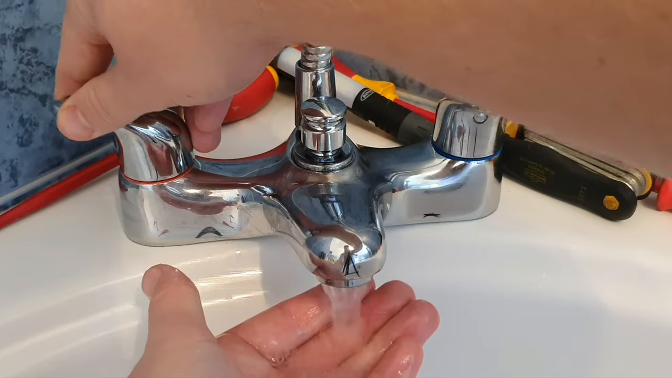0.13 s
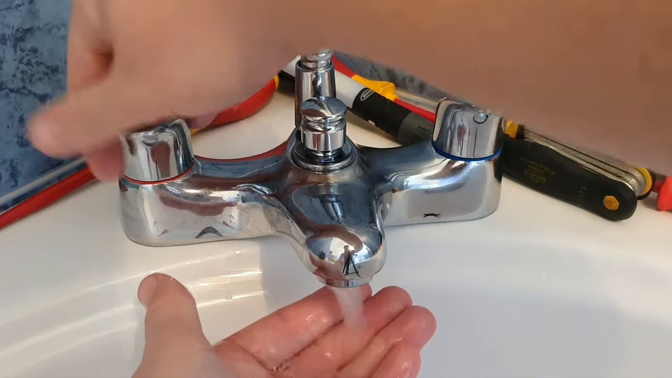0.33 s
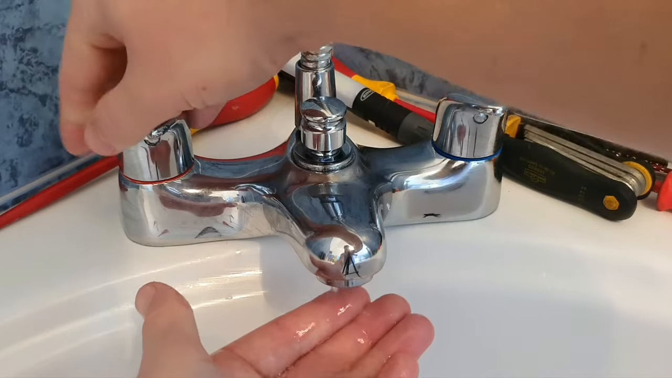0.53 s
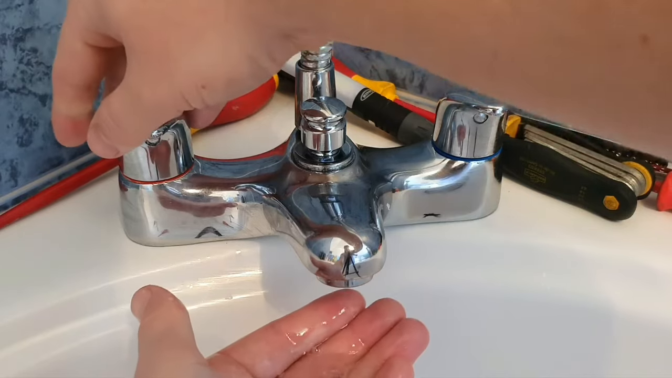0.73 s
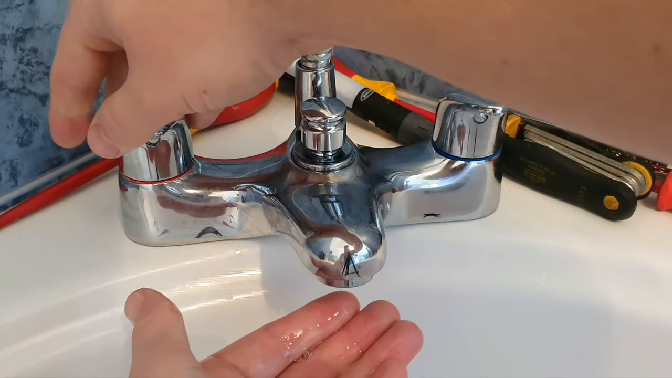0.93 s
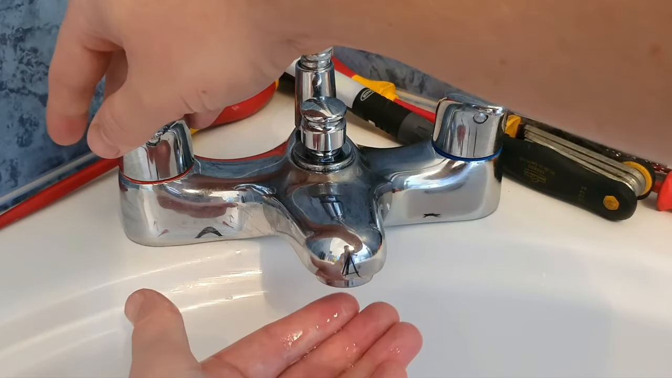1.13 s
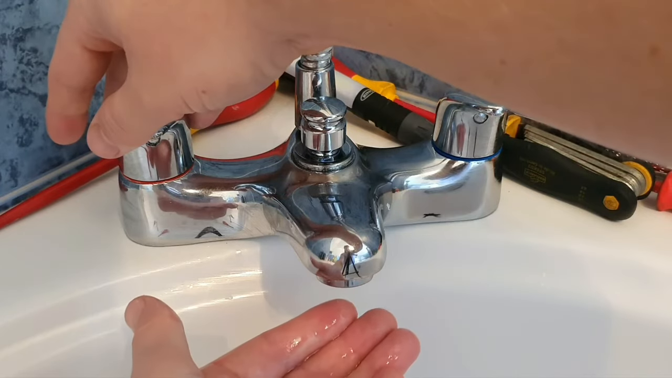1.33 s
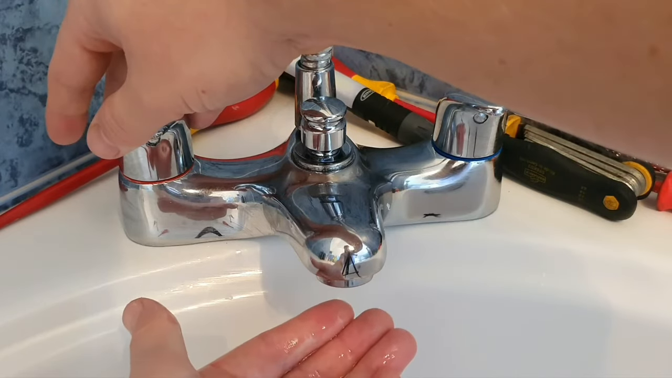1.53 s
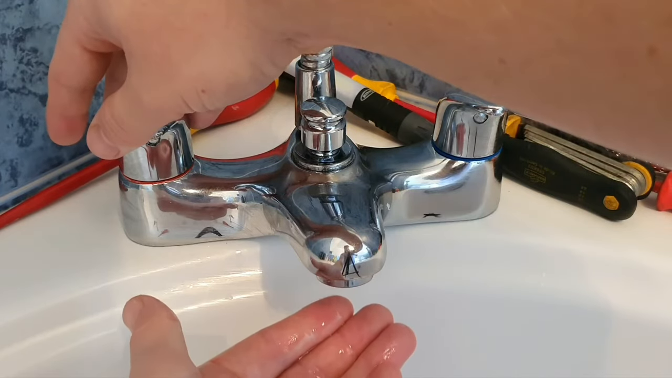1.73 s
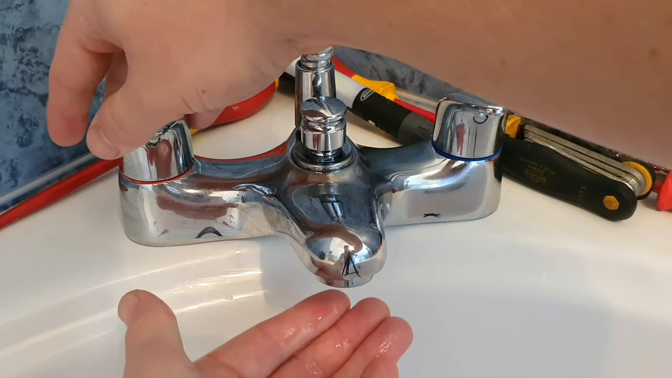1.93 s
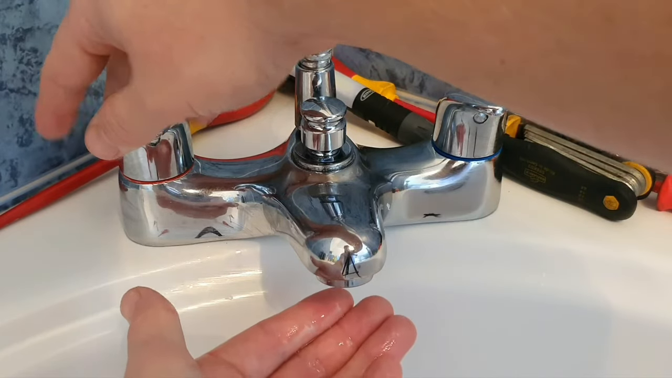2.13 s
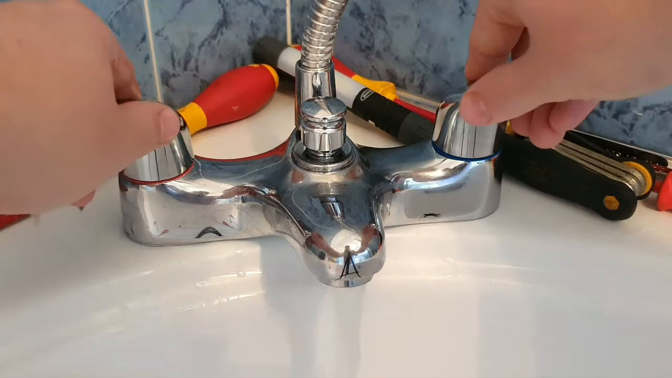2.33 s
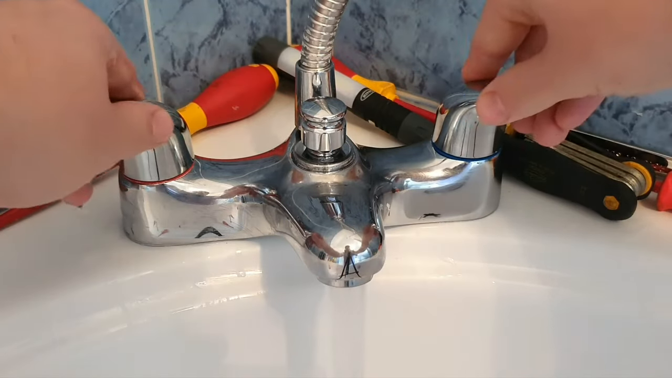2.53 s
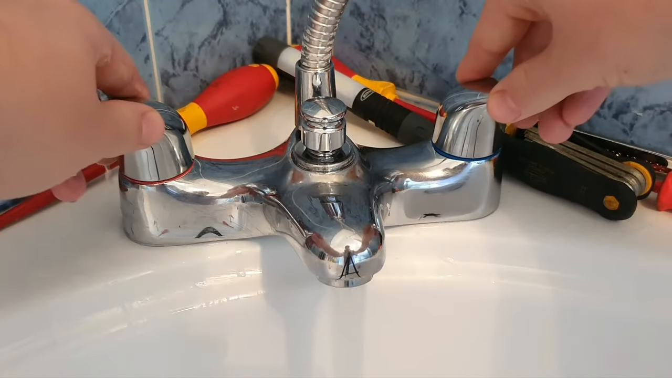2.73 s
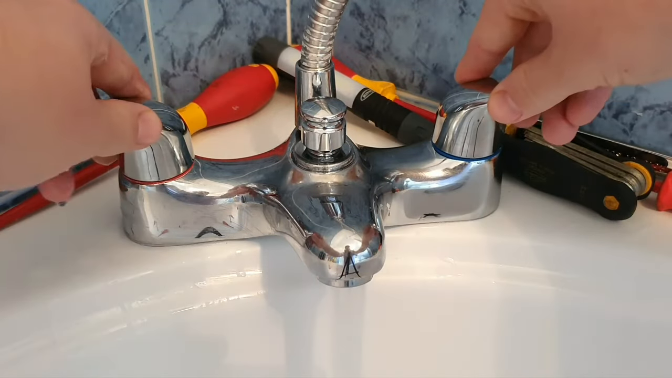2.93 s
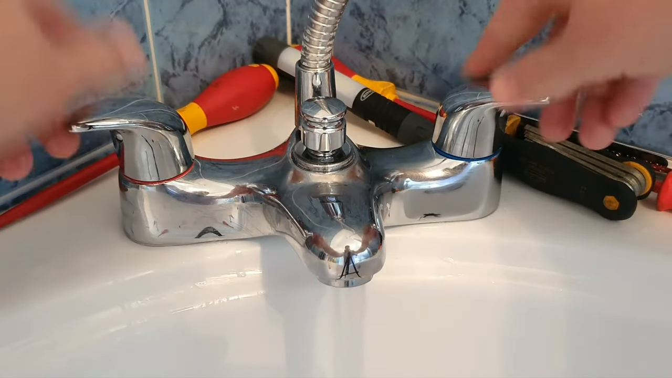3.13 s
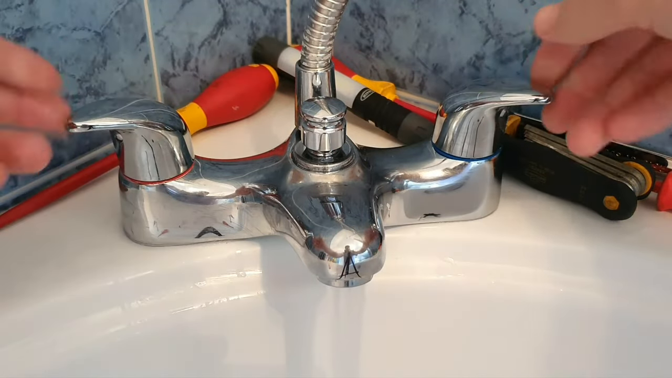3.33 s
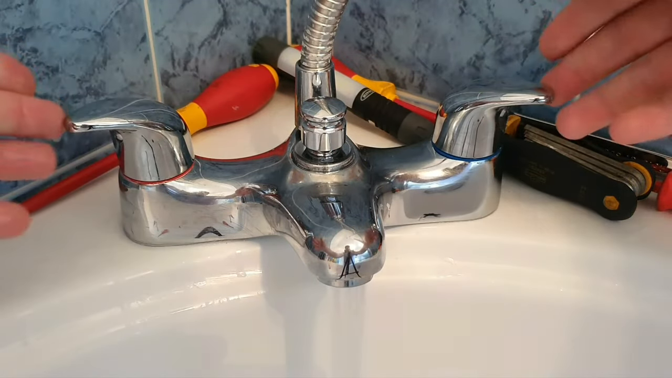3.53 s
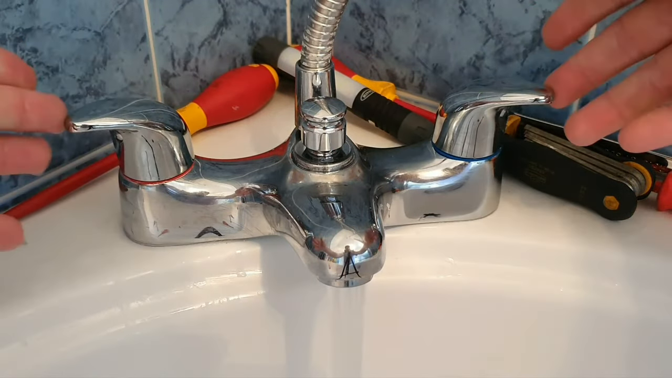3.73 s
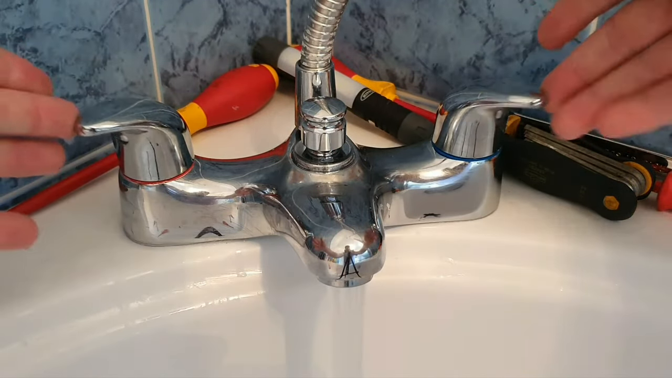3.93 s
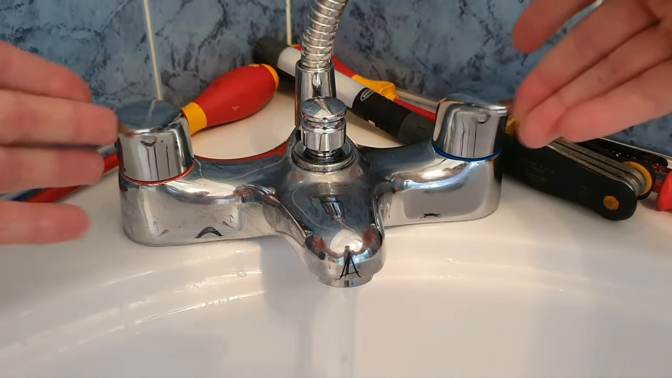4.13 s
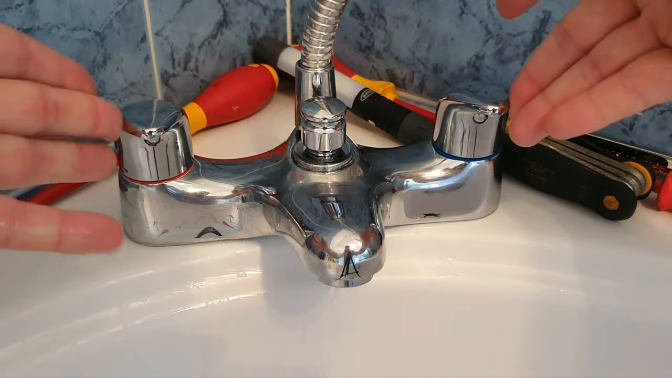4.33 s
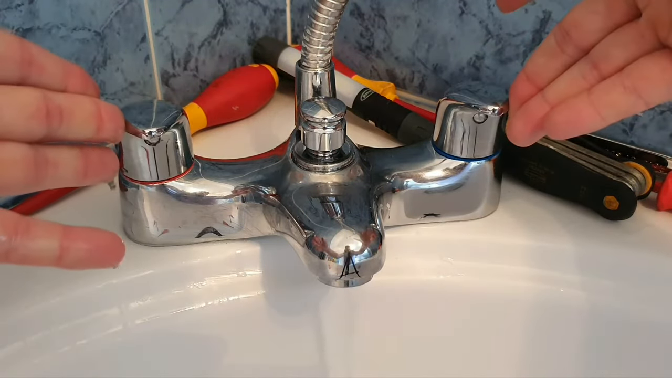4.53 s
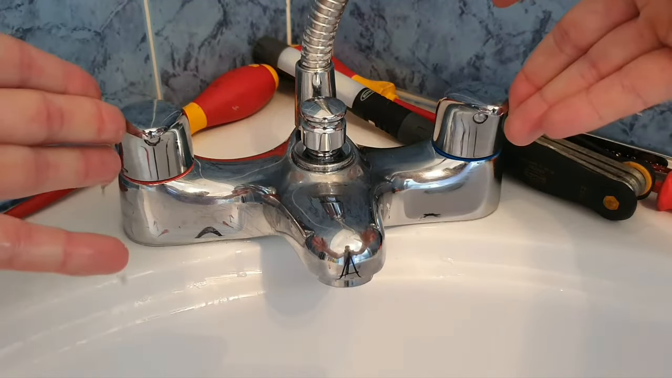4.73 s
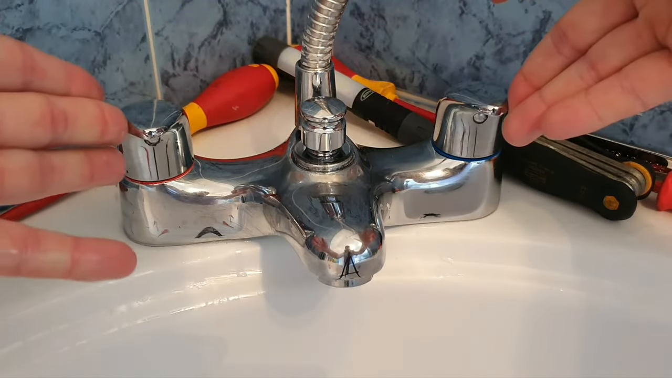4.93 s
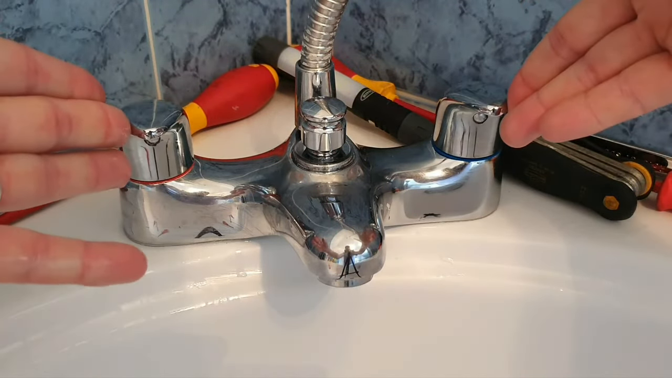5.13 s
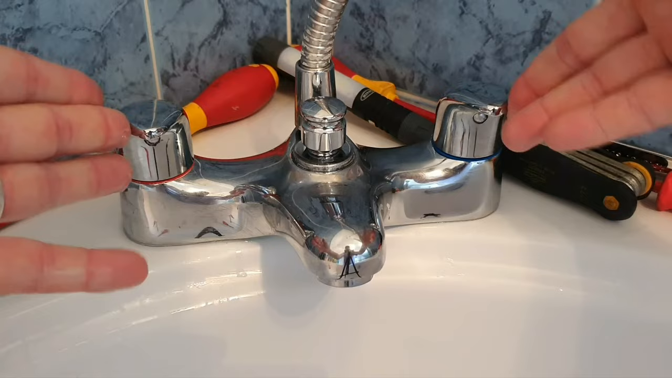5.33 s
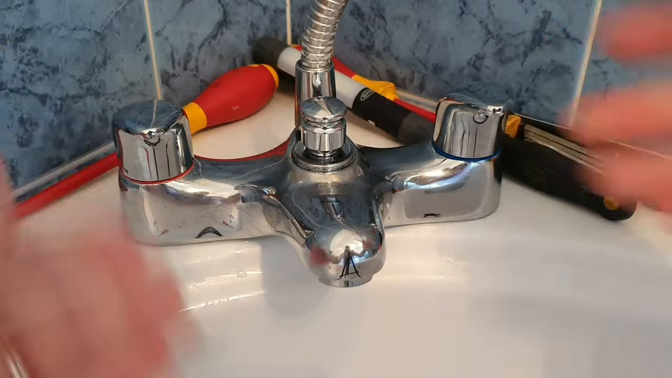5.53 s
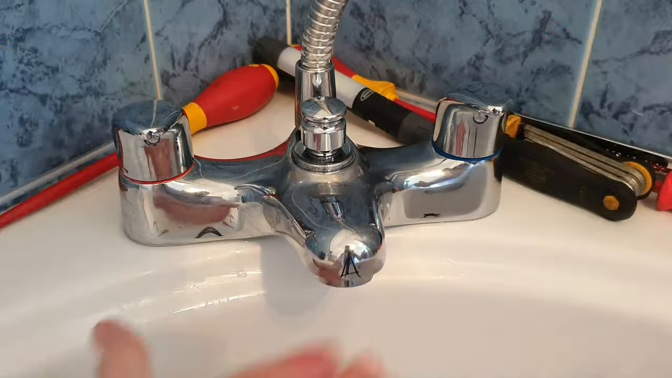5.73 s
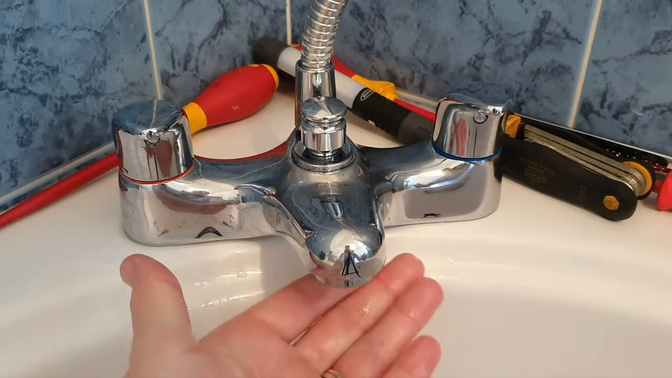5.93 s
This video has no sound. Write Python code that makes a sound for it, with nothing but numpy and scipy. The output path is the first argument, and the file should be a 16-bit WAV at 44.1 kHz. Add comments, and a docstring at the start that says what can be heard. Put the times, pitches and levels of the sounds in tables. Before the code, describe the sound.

Tap water splashes on a hand and dribbles off, then two taps gush into an empty bathtub and are shut, leaving faint drips.

```python
"""Water splats on a hand under a bath tap and dribbles off; then both taps gush into the empty tub and are shut.
Heard from beside the tub in a small tiled bathroom, on a stereo pair of microphones.
Splats and drips ring pockets of trapped air, thrown back by the tub and the tiles. The broken stream hisses,
gurgles in the pool and drums the tub's thin shell. Between the two flows a trickle murmurs in the drain.
The last drips fall over a quiet room hum."""
import sys
import numpy as np
from scipy import signal
from scipy.fft import next_fast_len
from scipy.io import wavfile
from scipy.ndimage import uniform_filter1d

SR = 44100
rng = np.random.default_rng(int(sys.argv[2]) if len(sys.argv) > 2 else 0)


def transcribe(signal):
    """Save signal, clipped to [-1, 1], as a 16-bit WAV file at the path in sys.argv[1]."""
    frames = np.atleast_2d(signal).T
    limited = np.clip(frames, -1, 1)
    pcm = np.round(limited * 32767).astype(np.int16)
    wavfile.write(sys.argv[1], SR, pcm)


N = 267907

# water hitting skin and tub: (time [s], level [dB], trapped air pitch [Hz], ring length [cycles])
SPLATS = [(0.067, -50, 4070, 2.2), (0.1406, -32, 2210, 2.1), (0.187, -32, 2440, 1.1),
          (0.206, -30.5, 4850, 1.5), (0.2213, -24.5, 3390, 1.1), (0.265, -31, 5500, 2.6),
          (0.3092, -41.5, 1800, 1.2), (0.3442, -26.5, 4940, 1.9), (0.371, -17, 3430, 1.7),
          (0.4395, -12, 3180, 1.3), (0.5524, -41, 3940, 2.1), (0.624, -39, 4100, 3.1),
          (0.6933, -32, 3560, 2.1), (0.7131, -10.5, 2780, 1.25), (0.9313, -30, 3800, 4.7),
          (1.017, -25, 3180, 1.3), (1.1114, -32, 2820, 1.5), (1.3751, -31.5, 1610, 0.76),
          (1.4334, -24, 4680, 1.7), (1.498, -33, 1560, 0.7), (1.517, -26.5, 1610, 0.92),
          (1.5683, -27.5, 2480, 0.7), (1.6351, -23, 4050, 0.89), (1.7573, -32, 1870, 1.26),
          (1.8865, -37, 1530, 1.8), (2.2127, -33, 4260, 2.7), (2.2835, -42, 1830, 2.1),
          (2.371, -29, 1350, 1.8), (2.5053, -29.5, 4200, 1.3), (2.6021, -20.5, 3150, 2.6),
          (2.6405, -19, 3220, 2), (2.6958, -20, 2680, 2.1), (2.7382, -29, 2700, 1),
          (2.8909, -32, 2180, 1.2), (2.9572, -17.5, 2590, 2.5), (3.0586, -38.5, 2600, 0.94),
          (3.145, -19, 4300, 1.8), (3.1777, -12.5, 3880, 1.8), (3.1945, -18.5, 2180, 1.8),
          (3.2648, -7, 3010, 1.07), (3.3714, -21.5, 3270, 1.1), (3.3912, -25.5, 6140, 2.2),
          (3.4488, -20.5, 6440, 3.2), (3.5366, -15.5, 4060, 1.5), (3.5754, -11, 6040, 1.06),
          (3.6432, -33, 2450, 1.1), (3.724, -30, 2250, 2.7), (3.8143, -28.5, 3240, 1.4),
          (3.9477, -18, 3840, 1.2), (4.0343, -32, 2080, 1.8), (4.462, -23.5, 3300, 1.2)]
# small fast droplets: (time [s], level [dB], pitch [Hz])
TICKS = [(0.186, -25.5, 6080), (0.2623, -28, 6180), (0.3493, -20, 10600), (0.3709, -12.5, 6040),
         (0.417, -18.5, 10200), (0.436, -17.5, 6440), (0.7355, -44, 6200), (0.929, -41, 11200),
         (1.0196, -29, 10100), (1.126, -14.5, 12600), (1.4342, -19, 6230), (1.5162, -19.5, 8490),
         (1.5698, -20.5, 11000), (1.634, -22.5, 6400), (1.853, -30, 11300), (1.8862, -19.5, 7650),
         (2.07, -36.5, 11000), (2.213, -27, 6300), (2.4772, -23.5, 10600), (2.5073, -17, 6360),
         (2.601, -25, 6090), (2.6376, -17.5, 6200), (2.833, -33.5, 7100), (2.895, -12, 11100),
         (2.958, -18.5, 7620), (3.0114, -13, 9260), (3.0966, -7.5, 11190), (3.1426, -10, 7590),
         (3.164, -21, 13160), (3.179, -4.5, 6160), (3.194, -5, 11000), (3.262, -2, 8640),
         (3.372, -21, 8420), (3.3913, -8, 6000), (3.4516, -27, 7650), (3.537, -15, 6550),
         (3.5758, -10, 6800), (3.6433, -13, 6000), (3.813, -20, 6640), (3.866, -18, 6640),
         (3.922, -14, 7900), (4.1546, -43, 8650), (4.172, -23, 10500), (4.438, -21.5, 6540)]
# drops that trap one bubble: (time [s], level [dB], pitch [Hz], ring t60 [s])
DRIPS = [(.141, -31, 2330, 0.024), (2.96, -29, 2500, 0.022), (3.205, -21.5, 2068, 0.057),
         (3.615, -15.5, 2300, 0.011), (3.775, -34, 1260, 0.031), (4.39, -46, 2220, 0.034),
         (4.526, -36.5, 1300, 0.042), (4.661, -58, 1700, 0.018), (4.831, -62, 5400, 0.0077),
         (4.941, -53, 1140, 0.017), (4.955, -57.5, 5060, 0.0082), (5.05, -50, 11000, 0.0064),
         (5.10, -49, 2000, 0.0064), (5.12, -48, 10000, 0.0039), (5.74, -64.5, 4200, 0.0086),
         (5.76, -57, 4370, 0.0086), (5.84, -46.5, 3680, 0.0076), (5.905, -60, 3670, 0.014),
         (5.958, -50, 4160, 0.013), (6.035, -65, 2800, .006)]
# the broken stream: (time [s], spray level [dB], fizz level [dB])
STREAM_LEVELS = [(0.0, -43.5, -63), (0.18, -49.5, -49), (0.41, -43.5, -44), (0.51, -54, -55.5),
                 (1.0, -49, -57.5), (1.2, -60, -73), (1.45, -65, -76), (1.6, -51, -57), (1.84, -59.5, -65),
                 (2.04, -69, -70), (2.33, -62, -75), (2.7, -38.5, -45), (3.23, -35.5, -33.5),
                 (3.73, -43, -46.5), (4.09, -44, -46), (4.41, -55.5, -56), (4.6, -72.5, -75.5),
                 (4.83, -88.5, -88), (5.58, -89.5, -91), (6.07, -82.5, -98)]
# gouts of water: (start [s], rise [s], spray gain [dB], pool gain [dB], upper shell gain [dB], fade [s])
GOUTS = [(.46, .03, 16.5, -2.5, 9, 0.092), (.55, 0.015, 9, -4.5, 3.5, 0.015), (.7, 0.04, 16, -4, 0.5, 0.15),
         (1.86, 0.067, 13, 11, 5.5, 0.17), (2.365, 0.0063, 21, 7.5, 0.5, .06),
         (2.7, 0.026, -2.5, 12, 1.5, 0.18), (3.028, 0.022, 6, 14, 11.5, .03),
         (3.37, 0.016, 2, -9, -1, 0.026), (3.57, 0.036, 14.5, -6, 0.1, 0.048), (3.9, .04, 7.5, -2, 2, .05),
         (4.12, 0.072, 19, 14.5, 2.5, 0.092), (4.33, 0.036, -2, -3, 12, 0.12),
         (4.442, 0.027, 21.5, 2, -0.7, 0.16), (4.9, 0.084, 0, 6.5, 4, 0.16), (5.07, .04, 8, 8, 5, 0.053),
         (5.66, 0.062, 6, 4.5, 11, 0.09)]
# spectra of the spray and of its finest drops: (frequency [Hz], level [dB])
SPRAY_TONE = [(820, -39.5), (1400, -9.5), (1850, -1), (2130, -1.5), (2460, -1), (3210, -1.5), (3450, -1),
              (3900, -1.5), (7000, -11), (9100, -38), (15400, -120)]
FIZZ_TONE = [(2940, -30.5), (5000, -14), (6780, 1.5), (7980, 1), (8660, 3.5), (11100, 6), (14000, -1.5),
             (14800, -24.5)]
# drumming on the tub, one list before the gush lands and one after:
# (time [s], bass level [dB], upper mode level [dB], deepest sway level [dB])
DRUM_LEVELS = [
    [(0.0, -30, -37, -39), (0.17, -46, -41, -63), (0.22, -33, -41.5, -45), (0.4, -47, -37, -39.5),
     (0.44, -33, -44, -51.5), (0.49, -16, -30.5, -28), (0.61, -26, -36.5, -44), (0.8, -48, -43.5, -45),
     (0.87, -37.5, -51.5, -47.5), (1.49, -57.5, -52, -49.5), (1.95, -48, -58, -51.5),
     (2.04, -58, -60.5, -69), (2.34, -41.5, -55, -42), (2.36, -58, -53, -43)],
    [(2.38, -34, -28, -47), (2.42, -31.5, -36, -30.5), (2.58, -32.5, -39.5, -43), (2.81, -39.5, -36, -43),
     (2.89, -32.5, -38.5, -39), (2.98, -33, -37.5, -40.5), (4.0, -42.5, -42, -39.5),
     (4.07, -38.5, -38, -50), (4.32, -40, -42, -43), (4.77, -59.5, -62, -64), (5.28, -51.5, -79.5, -59),
     (5.69, -69.5, -82, -65), (5.78, -56, -75.5, -53.5), (6.07, -60, -79, -66)],
]
# a lever stops or the gush lands: (time [s], level [dB], hardness cutoff [Hz], shudder decay [s])
KNOCKS = [(0.476, -38.5, 495, 0.081), (2.371, -26.5, 1740, .03), (3.047, -38, 800, .02),
          (4.322, -26, 374, .04)]
# resonances of the tub's shell, the pool and the drain pipe: (frequency [Hz], width [Hz], gain [dB])
LOW_SHELL_MODES = [(56.4, 15, -10), (81.6, 9.1, -12.5), (104.16, 6.5, -4)]
HIGH_SHELL_MODES = [(160.4, 35.2, 1.5), (184.5, 26, -6.5), (245, 26, -1.5), (344.3, 33, 0), (390, 43, 0),
                    (442.8, 34, -2), (492.3, 14, -1.5), (556.3, 20, 1), (623.6, 15, -3), (671, 53, -12)]
POOL_MODES = [(645, 48, -4.5), (800, 66, 1), (883, 230, -3), (1185, 180, -2), (1300, 590, -10)]
DRAIN_MODES = [(710, 57, 8.5), (1260, 150, 4), (1610, 53, 9), (1900, 64, 10.5), (2440, 430, -1),
               (2800, 220, 1)]
# ring of the tiled room: (frequency [Hz], t60 [s])
TILE_DECAY = [(300, 0.067), (1000, 0.34), (3000, 0.32), (8000, 0.23), (14000, 0.28)]
# spectrum of the room hum: (frequency [Hz], level [dB])
HUM_TONE = [(88, -31), (150, -2.5), (221, -12), (416, -27), (972, -26.5), (3670, -37), (6940, -47),
            (13900, -32.5), (15000, -52)]
# how alike the two microphones hear a hiss: (frequency [Hz], correlation [-1 to 1])
MIC_LIKENESS = [(60, 0.93), (180, 0.57), (550, -0.19), (1650, -0.12), (4970, 0.45), (15000, -0.45)]
# which microphone hears it louder: (frequency [Hz], left minus right [dB])
MIC_BALANCE = [(60, -4.5), (240, -0.5), (950, 0), (3770, -3), (15000, 0)]

TIME = np.arange(N) / SR
SIDES = np.array([[1], [-1]])  # plus at the left microphone, minus at the right


def splats():
    """Each splat is a pocket of air smeared over a few droplets; each tick is a bare crack."""
    hand_pan_db, tub_pan_db, hand_gone_s = -1.7, -0.1, 2.4  # the hand is right of centre
    out, t = np.zeros((2, N)), np.arange(600) / SR
    droplets = sparse_noise((len(SPLATS), len(t)), density=.05)
    for (start, db, hz, cycles), train in zip(SPLATS, droplets):
        impacts = (t == 0) + 1.1 * train * np.exp(-t / 0.0026)
        pocket = np.convolve(impacts, pop(hz, cycles, t))
        add(out, start, gain_of(db) * pocket / abs(pocket).max())
    for start, db, hz in TICKS:
        add(out, start, gain_of(db) * pop(hz, 0.9, t))
    pan_db = np.where(TIME < hand_gone_s, hand_pan_db, tub_pan_db)
    return out * gain_of(pan_db * SIDES)


def drips():
    """A drop traps a bubble that starts softly and sings briefly, gliding up."""
    out, t = np.zeros((2, N)), np.arange(4000) / SR
    onset = (1 - np.exp(-t / 0.00062)) ** 2
    for start, db, hz, t60 in DRIPS:
        bubble = np.sin(2 * np.pi * hz * t * (1 + 0.95 * t))
        add(out, start, gain_of(db - 60 * t / t60) * onset * bubble)
    return out


def crackle():
    """Many tiny drops burst, a few of them larger; their level follows the spray."""
    drops_per_s, pitches = 120, np.geomspace(2500, 12000, 24)
    sizes = gain_of(1.4 * np.minimum(rng.exponential(1, N), 3.5))
    bursts = sizes * (rng.random(N) < drops_per_s / SR)
    pitch_index = rng.integers(0, len(pitches), N)
    out, t = np.zeros((2, N)), np.arange(400) / SR
    for k, hz in enumerate(pitches):
        out[k % 2] += signal.oaconvolve(bursts * (pitch_index == k), pop(hz, 0.5, t))[:N]
    bleed = 0.28 * out[::-1]  # into the opposite microphone
    return gain_of(follow(STREAM_LEVELS, 1) - 8) * unit_rms(out + bleed)


def spray():
    """The stream breaks into hissing spray and a fizz of fine drops; both swell with each gout."""
    swell_db = gout_db(column=2)
    fizz_db = follow(STREAM_LEVELS, 2) + 0.93 * swell_db
    body_db = follow(STREAM_LEVELS, 1) + swell_db
    fizz = gain_of(fizz_db) * hiss(FIZZ_TONE, patchy_db=2.1, flicker_db=1.5)
    body = gain_of(body_db) * hiss(SPRAY_TONE, patchy_db=2.9, flicker_db=1.9)
    return body + fizz


def pool_gurgle():
    """Lumpy flow rings the pool, louder the harder the water drums the tub's upper modes."""
    lumps = gain_of(1.9 * unit_rms(uniform_filter1d(rng.standard_normal(N), 900)))
    gurgle = unit_rms(ring(rng.standard_normal((2, N)) * lumps, POOL_MODES))
    level_db = -48.5 + 1.136 * (follow(DRUM_LEVELS, 2) + 40) + gout_db(column=3)
    return gain_of(level_db) * gurgle


def tub_drumming():
    """Lumpy pressure of the stream shakes the shell; both microphones hear its bass almost alike."""
    push = rng.standard_normal((6, N))
    bass = ring_twice(push[0] + .04 * push[1] * SIDES, LOW_SHELL_MODES[1:])
    sway = ring_twice(push[2] + .08 * push[3] * SIDES, LOW_SHELL_MODES[:1])
    upper = ring_twice(push[4] * gain_of(-.3 * SIDES) + .3 * push[5] * SIDES, HIGH_SHELL_MODES)
    return (gain_of(follow(DRUM_LEVELS, 1)) * steadied(bass, share=0.26)
            + gain_of(follow(DRUM_LEVELS, 3)) * steadied(sway, share=.4)
            + gain_of(follow(DRUM_LEVELS, 2) + gout_db(column=4)) * unit_rms(upper))


def tub_knocks():
    """A dying shudder, each knock with its own hardness, rings all modes of the shell."""
    out, t = np.zeros((2, N)), np.arange(SR // 2) / SR
    for start, db, cutoff_hz, decay_s in KNOCKS:
        shudder = rng.standard_normal(len(t)) * np.exp(-t / decay_s)
        blow = signal.lfilter(*signal.butter(2, cutoff_hz, fs=SR), shudder)
        body = ring_twice(blow, LOW_SHELL_MODES + HIGH_SHELL_MODES) + .03 * blow
        add(out, start, gain_of(db) * body / abs(body).max())
    return out


def drain_trickle():
    """Left of centre, between the two flows, tiny quick drops keep the drain pipe's air murmuring."""
    start_s, rise_s, fade_from_s, fall_s = 1.15, 0.17, 2.46, 0.15
    rising, falling = (TIME - start_s) / rise_s, 1 - (TIME - fade_from_s) / fall_s
    flow = np.clip(np.minimum(rising, falling), 0, 1)
    murmur = unit_rms(ring(sparse_noise((2, N), density=.015), DRAIN_MODES))
    return flow * gain_of(-52 + 1.5 * SIDES) * murmur


def tub_reflections(x):
    """The direct sound, then the curved tub's echoes within milliseconds, different at each microphone."""
    t = np.arange(400) / SR
    echoes = rng.choice([-1., 1.], (2, 400)) * (rng.random((2, 400)) < .08)
    echoes *= .55 * np.exp(-t / .0025)
    echoes[:, 0] = 1  # direct path
    return signal.oaconvolve(x, echoes, axes=1)[:, :N]


def bathroom_reverb(x):
    """Echoes off the tiles farther out, each band dying at its own speed; three tails take turns."""
    out, build_up_s = np.zeros((2, N)), 0.0072
    for k in range(3):
        echoes = np.zeros((2, SR))
        arrivals = np.arange(100, SR - 20, 20) + rng.integers(0, 20, (2, (SR - 101) // 20))
        np.put_along_axis(echoes, arrivals, rng.choice([-1., 1.], arrivals.shape), 1)
        hz, lag, spectrum = signal.stft(echoes, SR, nperseg=256)
        build_up = 1 - np.exp(-lag / build_up_s)
        decay = gain_of(-60 * lag / at_hz(TILE_DECAY, hz))
        tail = signal.istft(spectrum * build_up * decay, SR, nperseg=256)[1]
        turn = np.sqrt(2 / 3) * np.cos(np.pi * (7 * TIME + k / 3))
        out += signal.fftconvolve(x * turn, tail / np.linalg.norm(tail[0]), axes=1)[:, :N]
    return out


def room_hum():
    """The bathroom's own faint, low, almost steady noise."""
    return gain_of(-70) * hiss(HUM_TONE, patchy_db=1.1, flicker_db=.1)


def pop(hz, cycles, t):
    """A pocket of air rings briefly with a soft start and a rising pitch; peak 1."""
    age = t * hz / max(cycles, .3)
    sound = age * np.exp(-3 * age) * np.sin(2 * np.pi * hz * t * (1 + 0.056 * age))
    return sound / abs(sound).max()


def hiss(tone, patchy_db, flicker_db):
    """Noise at the two microphones, with drifting patches in its spectrum and wide-band flicker."""
    frames, hz = N // 64 + 5, np.fft.rfftfreq(256, 1 / SR)
    left_re, left_im, other_re, other_im, patches = rng.standard_normal((frames, 129, 5)).T
    patches = unit_rms(uniform_filter1d(uniform_filter1d(patches, 6, 0), 30, 1))
    flicker = unit_rms(uniform_filter1d(rng.exponential(1, frames) - 1, 2))
    likeness = at_hz(MIC_LIKENESS, hz)
    left = left_re + 1j * left_im
    right = likeness * left + np.sqrt(1 - likeness ** 2) * (other_re + 1j * other_im)
    level_db = at_hz(tone, hz) + patchy_db * patches + flicker_db * flicker
    pan_db = at_hz(MIC_BALANCE, hz) / 2
    spectrum = np.array([left * gain_of(level_db + pan_db), right * gain_of(level_db - pan_db)])
    return unit_rms(signal.istft(spectrum, nperseg=256, noverlap=192)[1][:, :N])


def gout_db(column):
    """Gain from the gouts of water: a quick rise, then a fade."""
    out = 0
    for gout in GOUTS:
        start, rise, fade = gout[0], gout[1], gout[-1]
        past_peak = TIME - start - rise
        envelope = np.clip(1 + past_peak / rise, 0, 1) * np.exp(-np.maximum(past_peak, 0) / fade)
        out = out + gout[column] * envelope
    return out


def ring(x, modes):
    """Sum of resonances of alternating sign."""
    out = 0
    for k, (hz, width, db) in enumerate(modes):
        pole = np.exp((2j * np.pi * hz - np.pi * width) / SR)
        out = out + (-1) ** k * gain_of(db) * 2 * signal.lfilter([1 - abs(pole)], [1, -pole], x).real
    return out


def ring_twice(x, modes):
    """Each resonance passed twice, which leaves deep valleys between them."""
    return sum(ring(ring(x, [(hz, width, db)]), [(hz, width, 0)]) for hz, width, db in modes)


def steadied(x, share):
    """Evens out part of the random swelling of a narrow ring."""
    envelope = abs(signal.hilbert(x.mean(0), next_fast_len(N))[:N])
    return unit_rms(x / (envelope + 0.11 * x.std()) ** share)


def sparse_noise(shape, density):
    return rng.standard_normal(shape) * (rng.random(shape) < density)


def gain_of(db):
    return 10 ** (np.asarray(db) / 20)


def unit_rms(x):
    return x / np.sqrt(np.mean(x ** 2) + 1e-20)


def at_hz(points, hz):
    """A curve read along log frequency, one row per band."""
    frequencies, values = np.transpose(points)
    return np.interp(np.log(hz + 1), np.log(frequencies + 1), values)[:, None]


def follow(rows, column):
    """One column of a timed table at every sample."""
    rows = np.vstack(rows)
    return np.interp(TIME, rows[:, 0], rows[:, column])


def add(mix, start_s, sound):
    """Places a mono sound midway between the microphones."""
    part = mix[:, round(start_s * SR):][:, :len(sound)]
    part += sound[:len(part[0])]


def scene():
    """Beside the tub: drops echo off tub and tiles; stream, shell, drain and hum arrive direct."""
    drops = splats() + drips() + crackle()
    hum = room_hum()
    echoing_drops = gain_of(1.0) * tub_reflections(drops) + gain_of(5.5) * bathroom_reverb(drops)
    return echoing_drops + spray() + pool_gurgle() + tub_drumming() + tub_knocks() + drain_trickle() + hum


def record(dry):
    """The recorder passes both microphones up to 15 kHz."""
    lowpass = signal.firwin(255, 15000, window=("kaiser", 9), fs=SR)
    return signal.oaconvolve(dry, lowpass[None], "same")


dry = scene()
out = record(dry)
transcribe(out)
```